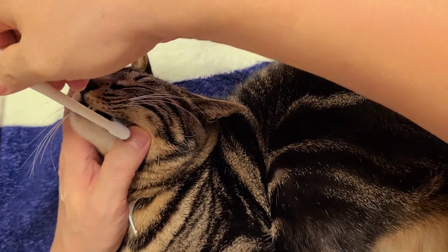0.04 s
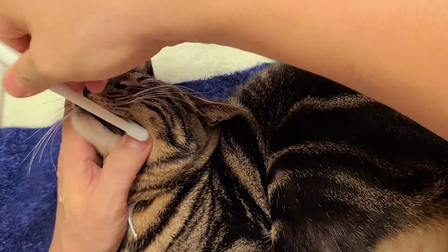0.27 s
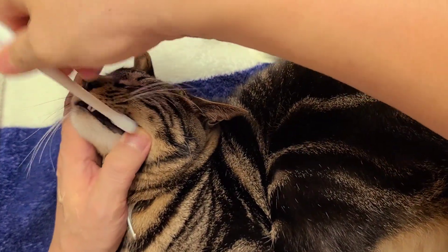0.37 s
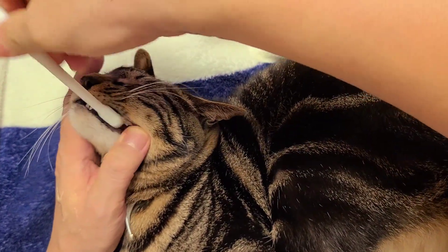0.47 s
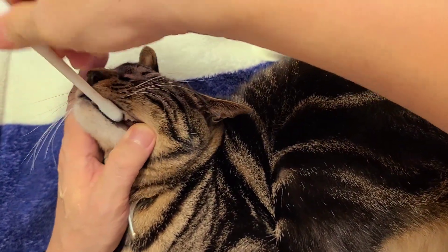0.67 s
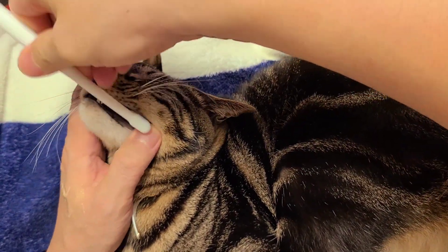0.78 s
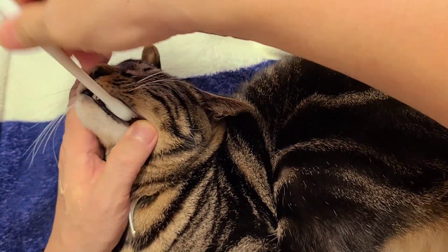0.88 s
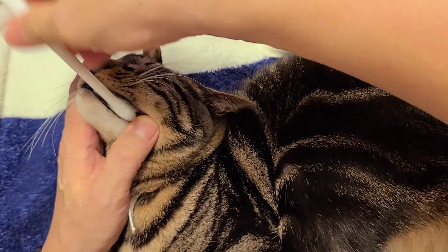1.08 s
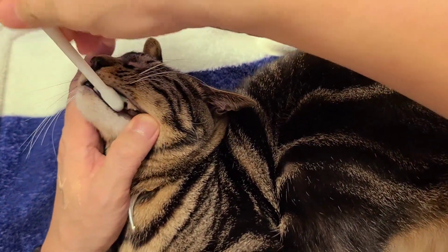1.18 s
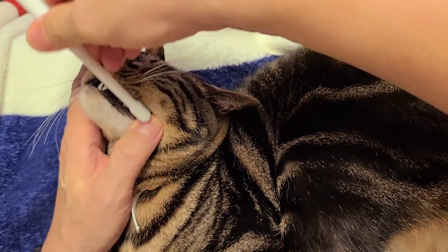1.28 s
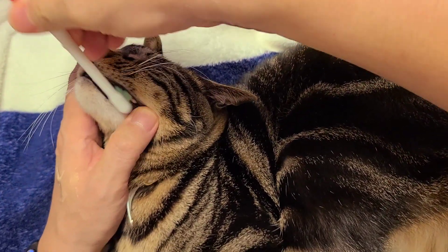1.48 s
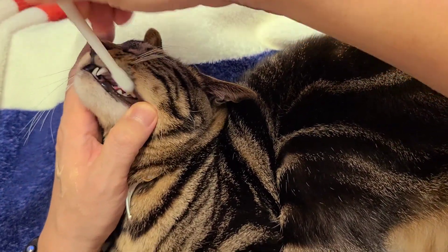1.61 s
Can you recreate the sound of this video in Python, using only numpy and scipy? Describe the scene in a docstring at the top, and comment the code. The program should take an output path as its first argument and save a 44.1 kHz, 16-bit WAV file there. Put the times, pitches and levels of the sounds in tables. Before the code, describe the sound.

A toothbrush softly scrubs a cat's teeth, with one dull bump over quiet room hum.

```python
"""A small toothbrush scrubs a cat's teeth in short, soft strokes, close up in a quiet room.
Bristles catch and flick free in dense tiny clicks: a bright fizz over a lower rasp, with soft rubs
along the muzzle and dull scuffs for body. One padded bump lands early; the wet lip ticks now and then.
Underneath sits a bed of low ventilation drone, wavering room hum and microphone hiss."""
import sys
import numpy as np
from scipy import signal
from scipy.fft import rfft, irfft
from scipy.io import wavfile
from scipy.ndimage import uniform_filter1d

SR = 44100
rng = np.random.default_rng(int(sys.argv[2]) if len(sys.argv) > 2 else 0)


def master(y):
    """Save y as 16-bit WAV."""
    cut = np.clip(np.atleast_2d(y).T, -1, 1)
    pcm = np.round(cut * 32767)  # scale
    wavfile.write(sys.argv[1], SR, pcm.astype(np.int16))


N = 72765

# tone of the moving air (frequency [Hz], relative level [dB])
AIR_EQ = [(20, -12.5), (50, -7.5), (130, -3.5), (250, -7), (380, -15), (560, -23), (800, -24), (1050, -20),
          (1350, -27.5), (1850, -31.5), (2400, -38), (3000, -31.5), (4000, -40.5), (8000, -51)]
# level ride of the faint rush near 1.3 kHz (time [s], level [dB])
RUSH_RIDE = [(0, -67.5), (.27, -63.5), (.34, -70), (.41, -78), (.47, -69), (.65, -65), (.76, -70.5),
             (.86, -65.5), (.93, -67), (1.12, -67), (1.28, -65), (1.39, -71.5), (1.52, -66), (1.65, -67)]
# tone of that rush (frequency [Hz], relative level [dB])
RUSH_EQ = [(600, -29.5), (900, -8), (1100, -3.5), (1300, 1.5), (1520, -1.5), (1700, -17), (2100, -15.5),
           (4000, -56)]
# higher room resonances that carry the drone (frequency [Hz], width [Hz], level [dB])
DRONE_BANDS = [(236, 46, -67), (310.1, 20.8, -65), (449.7, 64, -68.5), (653.7, 60, -72.5)]
# stereo image of the air (frequency [Hz], left-right correlation [-1..1])
AIR_IMAGE = [(100, 0.98), (280, 0.95), (480, 0.83), (700, -0.13), (900, -0.3), (1280, 0.2), (1700, -0.32),
             (2100, -0.12), (2900, -0.33), (4500, 0.015)]
# the low hum and the wider band of room noise above it (frequency [Hz], width [Hz])
ROOM_BANDS = [(110, 9.8), (180, 53.7)]
# level ride of the low hum (time [s], level before trim [dB])
LOW_HUM_RIDE = [(0.02, -53), (0.36, -49.5), (0.39, -58), (0.47, -53), (0.51, -58), (0.549, -48.5),
                (0.59, -56), (0.66, -52.0), (0.7, -60), (0.8, -54), (0.83, -56), (0.86, -50.5),
                (0.94, -58.0), (0.97, -51.5), (1.03, -56.5), (1.06, -49), (1.09, -51.5), (1.12, -60),
                (1.18, -49.5), (1.25, -53), (1.28, -58), (1.37, -60), (1.4, -48.5), (1.43, -58),
                (1.45, -50), (1.64, -59.5)]
# random swells and dips of the room noise near 180 Hz (time [s], level before trim [dB])
ROOM_NOISE_SWELLS = [(0.02, -53.5), (0.64, -62), (0.7, -52), (0.74, -60), (0.96, -54), (1.0, -61.5),
                     (1.04, -48.5), (1.11, -59.5), (1.15, -51), (1.19, -58.5), (1.43, -51), (1.64, -62)]
# stereo image of the bristles (frequency [Hz], left-right correlation [-1..1])
BRUSH_IMAGE = [(700, -0.58), (1400, 0.39), (2100, -0.69), (3000, -0.55), (4700, 0.27), (7500, -0.25),
               (10000, 0.082)]
# soft rubs on muzzle and teeth (centre [s], length [s], level [dB], resonance [Hz], width [Hz])
RUB_CUES = [(0.023, 0.13, -65.5, 1481, 906), (0.038, 0.2, -74.5, 3180, 1000),
            (0.211, 0.033, -66.5, 1980, 700), (0.218, .055, -68, 3440, 900), (0.246, 0.057, -78, 7000, 590),
            (0.28, 0.23, -79.5, 4040, 400), (0.53, 0.21, -74.5, 4130, 520), (0.518, 0.13, -75.5, 5550, 515),
            (0.468, 0.071, -64.5, 1317, 184), (0.599, 0.078, -65, 1257, 140), (1.239, 0.01, -65, 4450, 900)]
# body of the support that is bumped (frequency [Hz], relative level [dB], t60 [s])
BUMP_MODES = [(47.3, -11, 0.17), (74, 6, 0.075), (108, -1.5, .06), (155.5, -4, 0.071), (195, -2.5, 0.12)]
# the knock and its rebound (time [s], level before filtering [dB], low-pass cutoff [Hz])
BUMP_CUES = [(0.2256, -12.5, 225), (0.266, -29, 116)]
# dull scuffs near 450 Hz: the bump's click and the low body of strokes (centre [s], length [s], level [dB])
SCUFF_CUES = [(0.232, 0.0063, -60.5), (0.29, 0.22, -67), (1.092, 0.023, -60.5), (1.242, 0.028, -61)]
# brush strokes (centre [s], length [s], fizz level [dB], rasp over fizz [dB], fizz tilt [dB/octave])
STROKE_CUES = [(0.255, 0.037, -73.5, -4, 5), (0.37, 0.069, -79, -2, -3), (0.62, 0.05, -73.5, -1.5, 0),
               (0.749, 0.035, -64.5, 2, 0), (0.859, .055, -68.5, -0.5, -8), (1.005, 0.054, -65, -13, 3),
               (1.108, 0.055, -67.5, 1, -5), (1.24, 0.048, -65, -0.5, -2), (1.338, 0.1, -70.5, 0, 4),
               (1.397, 0.14, -70.5, -3.5, -11), (1.509, 0.07, -77, 6, -7), (1.573, 0.036, -64, -2.5, 3),
               (1.612, 0.047, -62, -1.5, -3)]
# tone of bristle tips springing free (frequency [Hz], relative level [dB])
FIZZ_EQ = [(3000, -40.5), (6500, -25), (9200, 4.5), (10800, 0), (12500, 2.5), (14000, -4), (15000, -1.5),
           (15700, -6)]
# tone of bristles on the teeth (frequency [Hz], relative level [dB])
RASP_EQ = [(400, 1), (800, -2.5), (1500, -10), (2400, -10.5), (3000, 3), (3800, -8), (4500, 2.5),
           (5400, -1.5), (6500, -3), (8500, -15.5), (16000, -53)]
# wet lip ticks (time [s], ring peak [dB], ring tilt [dB/octave], relative snap level [dB])
TICK_CUES = [(0.389, -71, 2, 15), (1.005, -60, 6, 15.5), (1.0195, -66, -2, 7), (1.0805, -49.5, 8, -22),
             (1.0817, -39, -1.5, -24), (1.1392, -46, 30, -0.5), (1.239, -53, -9, 2)]
# ring of the mouth cavity (frequency [Hz], relative level [dB], t60 [s])
MOUTH_MODES = [(880, -0.5, 0.025), (1520, -4.5, 0.035), (2520, -9, 0.021), (3480, -30.5, 0.016)]
# tone of the microphone hiss (frequency [Hz], relative level [dB])
HISS_EQ = [(500, -5), (2300, 0.5), (3000, 5.5), (3900, -16.5), (5400, 3), (7000, -8.5), (9500, -1.5),
           (12000, -3.5), (14000, -6.5), (15700, -16.5)]
# treble notch of the microphone port (frequency [Hz], gain [dB])
PORT_EQ = [(5600, 0.5), (6100, -13.5), (6600, -8), (6950, -10.5), (7900, -9), (8400, -5.5), (9100, -1.5)]

AIR_DB, HUM_TRIM_DB, HUM_STEADINESS = -57.5, -1, 0.81
FLICKS_PER_S, FLICK_SCATTER_DB, CATCH_PER_S, CATCH_DB = 4000, 1.5, 180, 1.5
BUMP_PAN_DB, BUMP_LOW_CUT_HZ = -1.7, 42
RESTING_DB, RESTING_RASP_DB, SETTLE_S = -77.5, -9.5, 0.65  # the light scrub between strokes fades in
TILT_PIVOT_HZ = 11000
SNAP_T60_S, TICK_RIGHT_GAIN = 0.0085, -0.099  # ticks reach the right side weaker and inverted
HISS_DB, HISS_PAN_DB, PORT_LAG_S, HIGH_CUT_HZ = -77, 12.5, 0.0002, 15720


def undb(db):
    """Decibels to gain."""
    return 10 ** (np.asarray(db) / 20)


def unit(x):
    """Scale to rms 1."""
    return x / np.sqrt(np.mean(x ** 2))


def pan(db):
    """Left and right gains; positive dB leans left."""
    return undb(np.array([[db], [-db]]) / 2)


def bins():
    """Frequency of each spectral bin."""
    return np.maximum(np.arange(N // 2 + 1) * SR / N, 1)


def curve(points):
    """Join (frequency [Hz], value) points on a log-frequency axis."""
    hz, value = np.array(sorted(points)).T
    return np.interp(np.log(bins()), np.log(hz), value)


def equalise(x, points):
    """Shape the tone with a (frequency [Hz], gain [dB]) curve."""
    return irfft(rfft(x) * undb(curve(points)), N)


def resonate(x, hz, width_hz):
    """A steep-sided resonance, rms 1."""
    detuning = (bins() ** 2 - hz ** 2) / (1.04 * width_hz * bins())
    return unit(irfft(rfft(x) / (1 + 1j * detuning) ** 2, N))


def stereo(pair, image):
    """Mix two unrelated signals as mid and side, to the correlation the image gives at each frequency."""
    correlation = np.clip(curve(image), -.99, .995)
    mid = rfft(pair[0]) * np.sqrt(1 + correlation)
    side = rfft(pair[1]) * np.sqrt(1 - correlation)
    return irfft(np.array([mid + side, mid - side]), N) / np.sqrt(2)


def late_right(pair):
    """Low sounds reach the right port a moment after the left."""
    delay = np.exp(-2j * np.pi * bins() * PORT_LAG_S)
    return np.array([pair[0], irfft(rfft(pair[1]) * delay, N)])


def noise():
    """Two unrelated white noises."""
    return rng.standard_normal((2, N))


def wander(per_s):
    """Smooth random drift, rms 1."""
    hold = int(SR / per_s)
    steps = np.repeat(rng.standard_normal(N // hold + 1), hold)
    return unit(uniform_filter1d(steps, hold)[:N])


def ride(t, points):
    """Fader gain along (time [s], level [dB]) points."""
    return undb(np.interp(t, *np.array(points).T))


def swell(t, centre, length):
    """A smooth rise and fall: a firm middle with light tails on either side."""
    return 1 / np.cosh(np.clip(np.pi * (t - centre) / length, -50, 50))


def ring(t, start, modes):
    """Damped modes struck at one moment."""
    age = np.maximum(t - start, 0)
    return sum(undb(db - 60 * age / t60) * np.sin(2 * np.pi * hz * age) for hz, db, t60 in modes)


def ventilation(t):
    """The bed: moving air, a wavering rush and a drone in the room's resonances."""
    air = undb(AIR_DB) * unit(equalise(noise(), AIR_EQ))
    rush = ride(t, RUSH_RIDE) * unit(equalise(noise(), RUSH_EQ))
    drone = sum(undb(db) * resonate(noise(), hz, width) for hz, width, db in DRONE_BANDS)
    return stereo(air + drone + rush, AIR_IMAGE) * pan(db=-0.8)


def room_hum(t):
    """The room's lowest resonance hums and wavers; the room noise just above it swells and dips."""
    hum = 0
    for (hz, width), levels in zip(ROOM_BANDS, (LOW_HUM_RIDE, ROOM_NOISE_SWELLS)):
        band = signal.hilbert(resonate(noise()[0], hz, width))
        compressed = unit(band.real / (np.abs(band) + 0.5) ** HUM_STEADINESS)
        hum = hum + compressed * ride(t, levels)
    return late_right(hum * undb(HUM_TRIM_DB) * pan(db=0.5))


def bristle_flicks():
    """Single bristles click in a dense, uneven grain; the level flutters as tufts catch and let go."""
    hits = rng.random((2, N)) < FLICKS_PER_S / SR
    clicks = hits * np.sign(noise()) * undb(FLICK_SCATTER_DB * noise())
    return stereo(clicks, BRUSH_IMAGE) * undb(CATCH_DB * wander(CATCH_PER_S))


def muzzle_rubs(t):
    """Light drags of the bristles whisper in one band each."""
    return sum(undb(db) * swell(t, centre, length) * resonate(bristle_flicks(), hz, width)
               for centre, length, db, hz, width in RUB_CUES)


def bump(t):
    """A padded knock on the support and its softer, duller rebound: only the low modes respond."""
    blows = 0
    for start, db, cutoff_hz in BUMP_CUES:
        padding = signal.butter(6, cutoff_hz, fs=SR, output="sos")
        blows = blows + signal.sosfilt(padding, undb(db) * ring(t, start, BUMP_MODES))
    thud = blows / np.abs(ring(t, 0, BUMP_MODES)).max()
    low_cut = signal.butter(4, BUMP_LOW_CUT_HZ, "high", fs=SR, output="sos")
    return late_right(signal.sosfilt(low_cut, thud) * pan(BUMP_PAN_DB))


def dull_scuffs(t):
    """Swells of low-mid noise give the bump its click and the strokes their low body."""
    envelope = sum(undb(db) * swell(t, centre, length) for centre, length, db in SCUFF_CUES)
    scuff = resonate(noise(), hz=450, width_hz=470)
    return envelope * stereo(scuff, AIR_IMAGE)


def brush_strokes(t):
    """Bristle tips fizz, brighter or duller with the brush's angle, over a lower rasp on the teeth."""
    resting = undb(RESTING_DB) * np.minimum(t / SETTLE_S, 1)
    fizz = resting * unit(equalise(bristle_flicks(), FIZZ_EQ))
    rasp = unit(equalise(bristle_flicks(), RASP_EQ))
    rasp_power = (resting * undb(RESTING_RASP_DB)) ** 2
    for centre, length, db, rasp_db, tilt in STROKE_CUES:
        speed = swell(t, centre, length)  # the hand speeds up and stops
        tilted_eq = [(hz, level + tilt * np.log2(hz / TILT_PIVOT_HZ)) for hz, level in FIZZ_EQ]
        fizz = fizz + speed * undb(db) * unit(equalise(bristle_flicks(), tilted_eq))
        rasp_power = rasp_power + (speed * undb(db + rasp_db)) ** 2
    return fizz + np.sqrt(rasp_power) * rasp


def lip_ticks(t):
    """A film of saliva snaps and briefly rings the mouth."""
    ticks = 0
    lowest_hz = MOUTH_MODES[0][0]
    for start, db, tilt, snap_db in TICK_CUES:
        modes = [(hz, level + tilt * np.log2(hz / lowest_hz), t60) for hz, level, t60 in MOUTH_MODES]
        cavity = ring(t, start, modes)
        age = np.maximum(t - start, 0)
        snap = noise() * (t >= start) * undb(snap_db - 60 * age / SNAP_T60_S) / 2
        ticks = ticks + undb(db) * (cavity / np.abs(cavity).max() + snap)
    return ticks * np.array([[1], [TICK_RIGHT_GAIN]])


def scene():
    """The dry mix: close brushing, lip ticks and one bump over the room tone."""
    t = np.arange(N) / SR
    bed = ventilation(t) + room_hum(t)
    return bed + muzzle_rubs(t) + dull_scuffs(t) + lip_ticks(t) + bump(t) + brush_strokes(t)


def record(dry):
    """The microphone adds hiss, more on the left, notches the treble and cuts the top."""
    hiss = undb(HISS_DB) * unit(equalise(noise(), HISS_EQ)) * pan(HISS_PAN_DB)
    high_cut = signal.ellip(12, .2, 70, HIGH_CUT_HZ, fs=SR, output="sos")
    return signal.sosfilt(high_cut, equalise(dry + hiss, PORT_EQ))


dry = scene()
out = record(dry)
master(out)
```